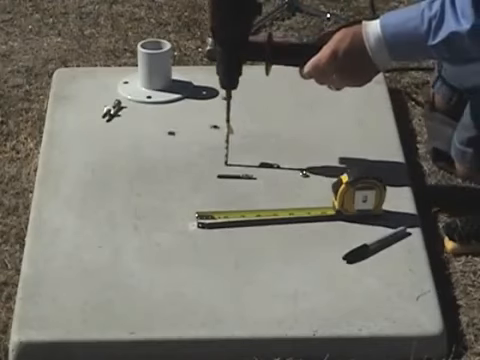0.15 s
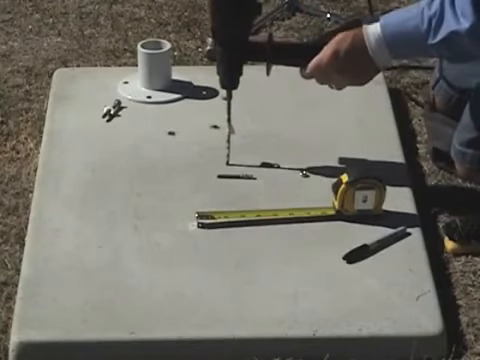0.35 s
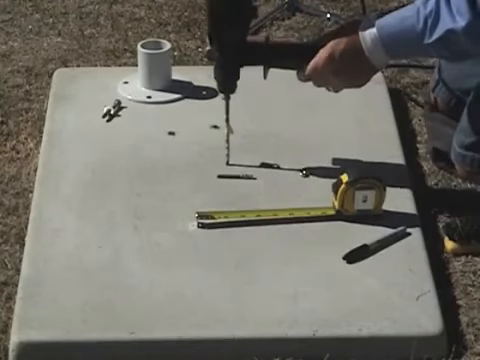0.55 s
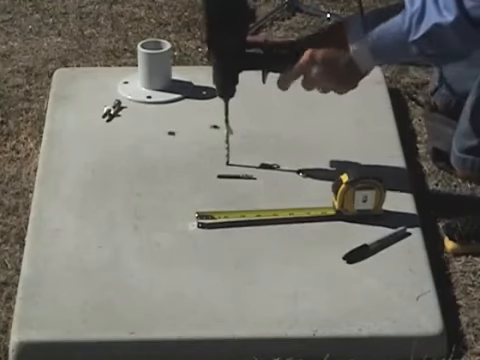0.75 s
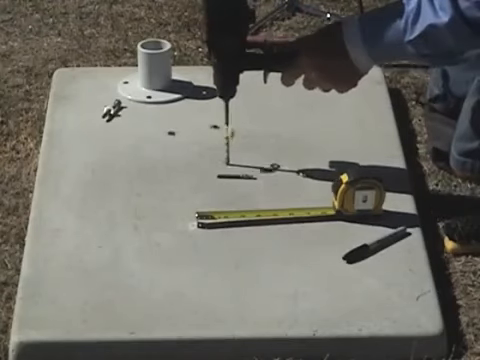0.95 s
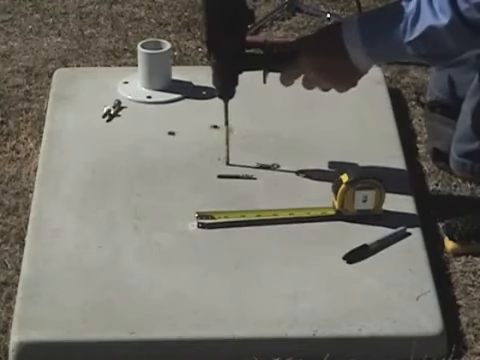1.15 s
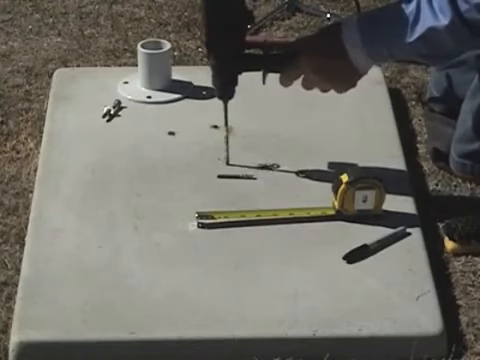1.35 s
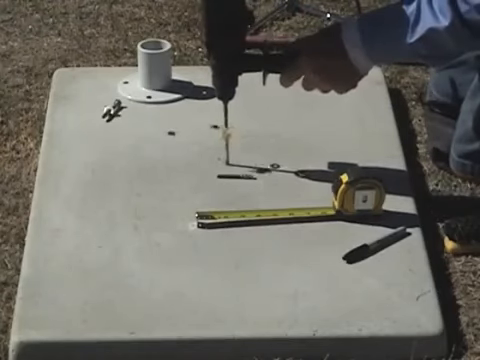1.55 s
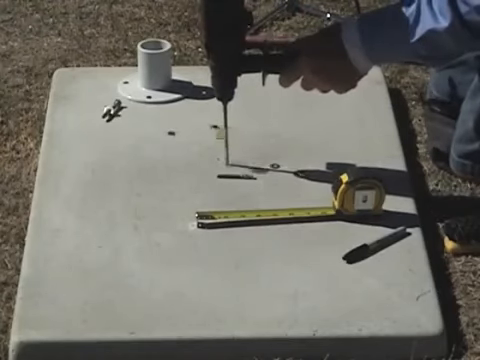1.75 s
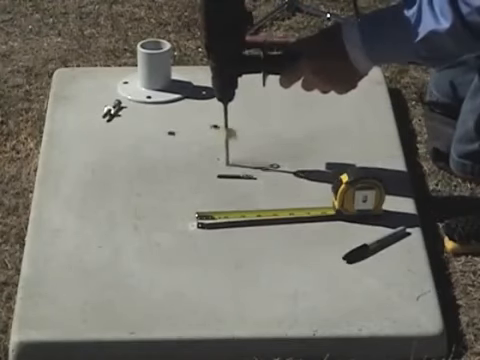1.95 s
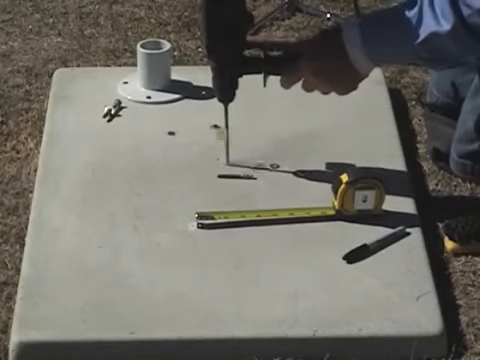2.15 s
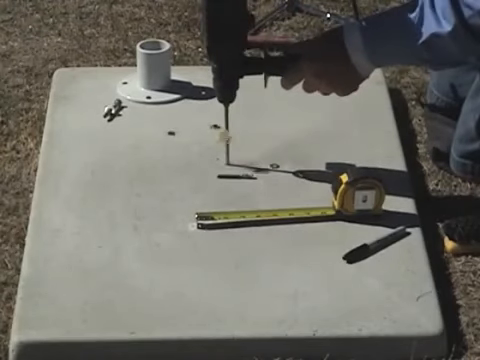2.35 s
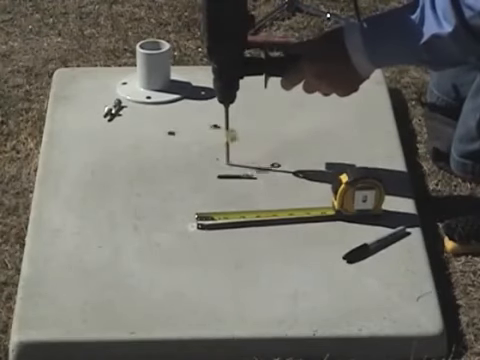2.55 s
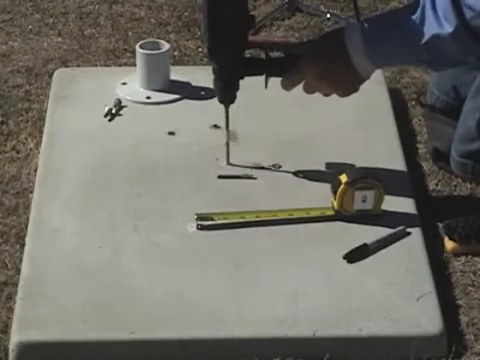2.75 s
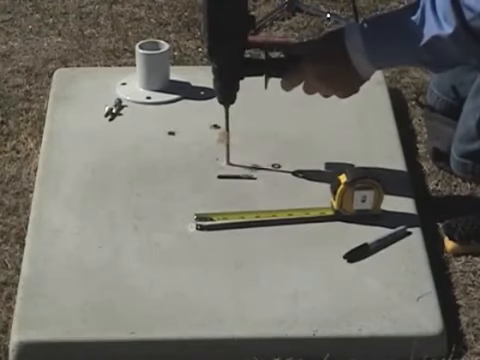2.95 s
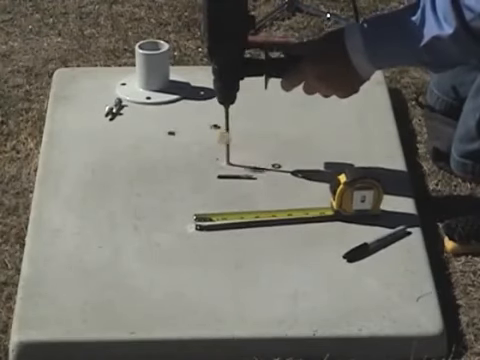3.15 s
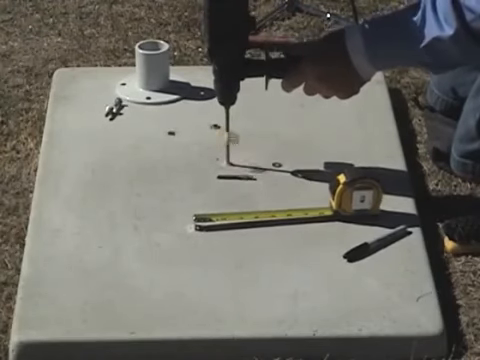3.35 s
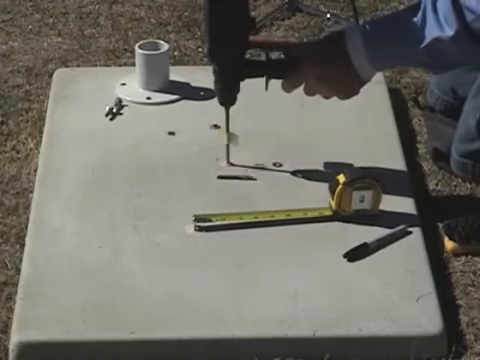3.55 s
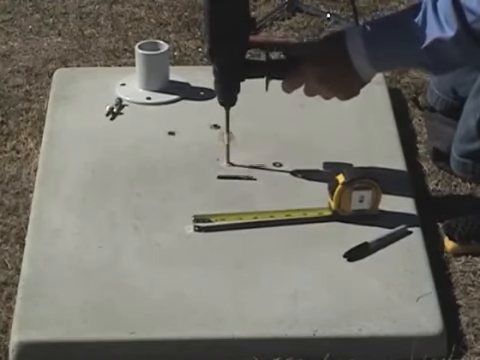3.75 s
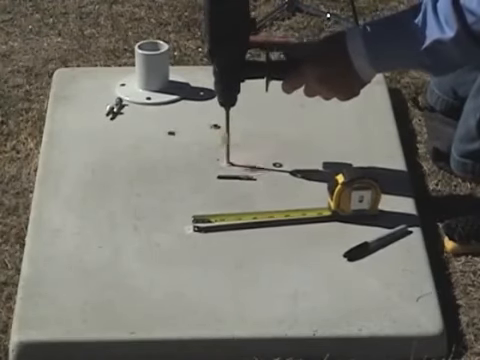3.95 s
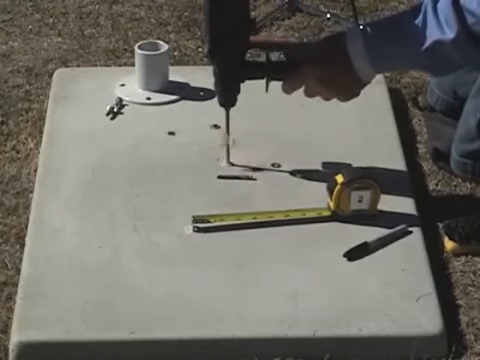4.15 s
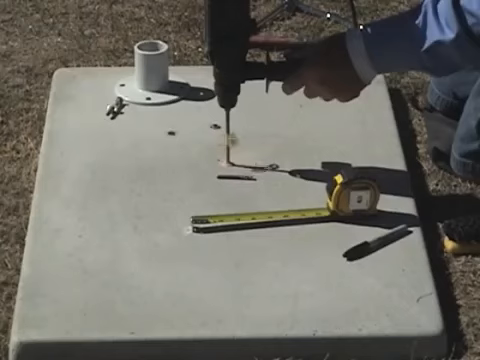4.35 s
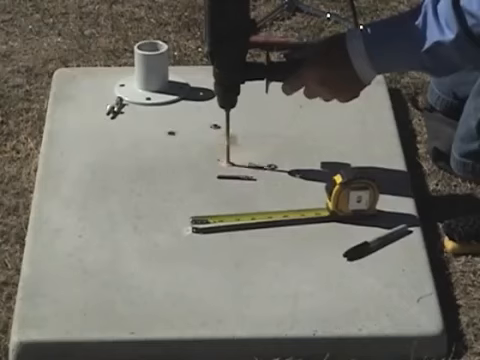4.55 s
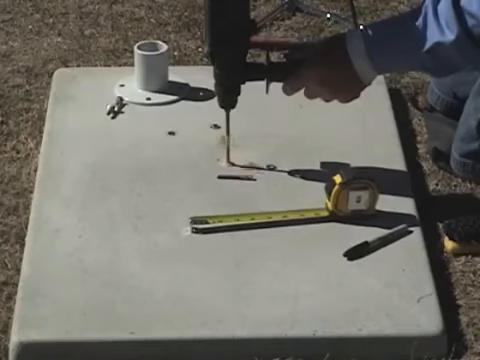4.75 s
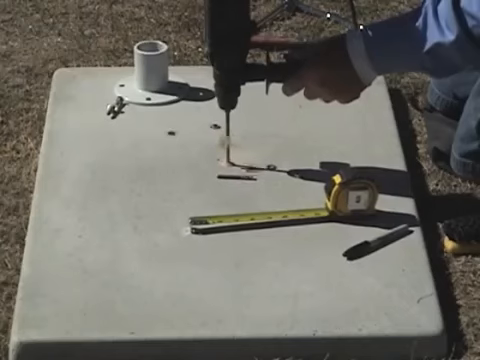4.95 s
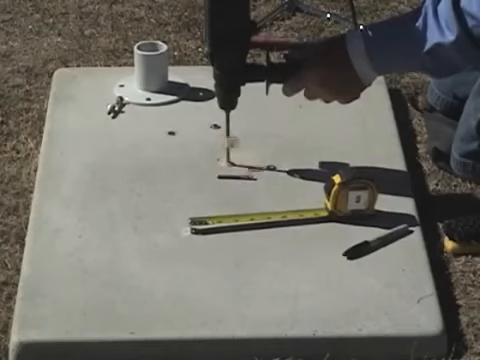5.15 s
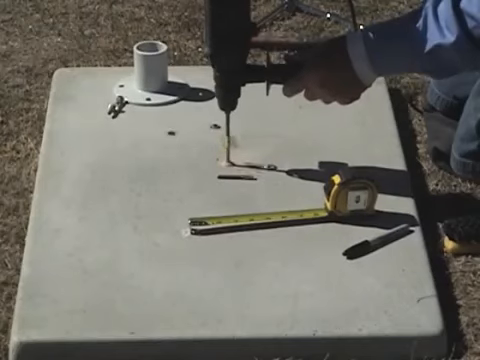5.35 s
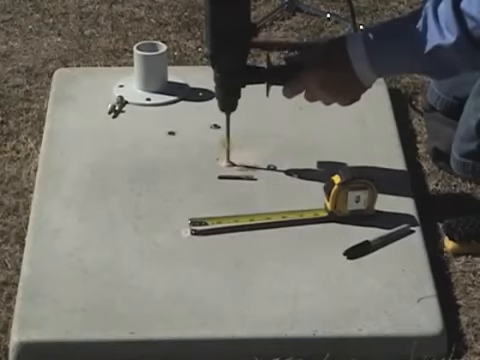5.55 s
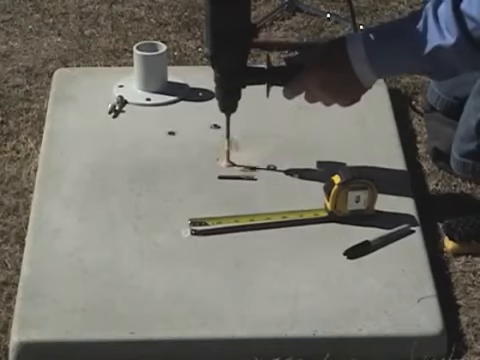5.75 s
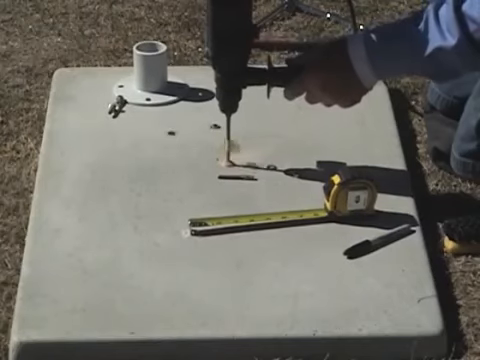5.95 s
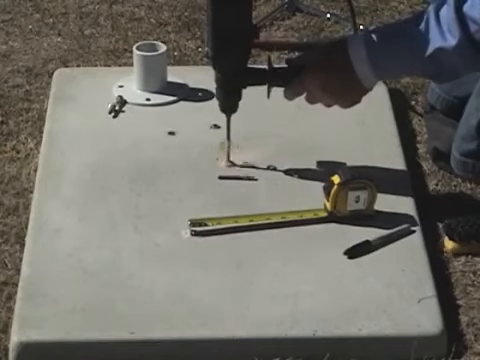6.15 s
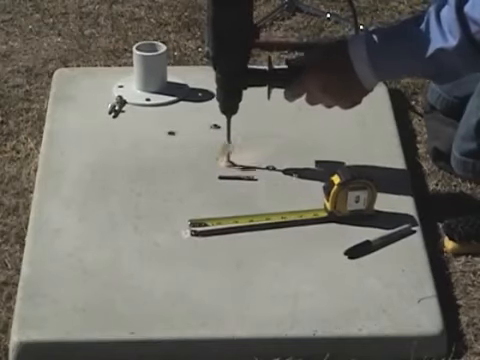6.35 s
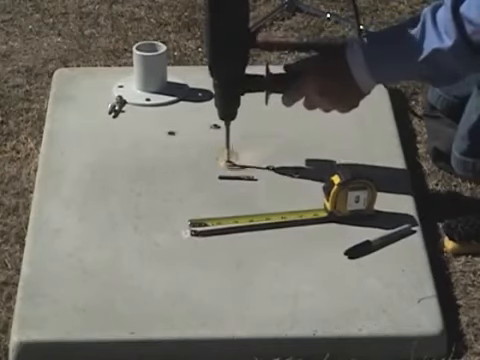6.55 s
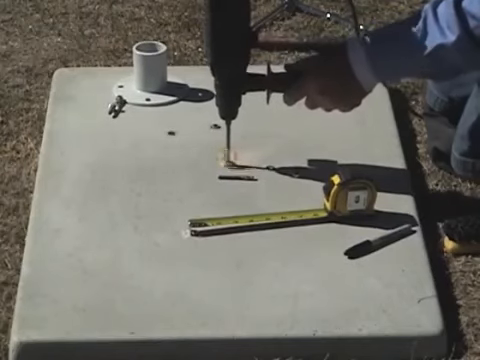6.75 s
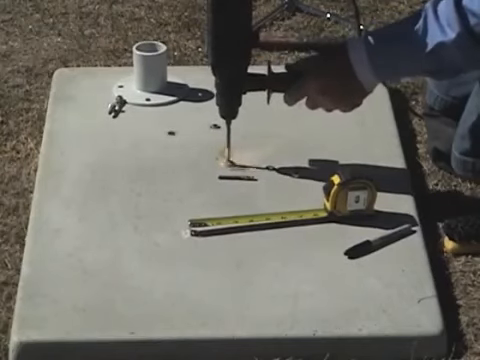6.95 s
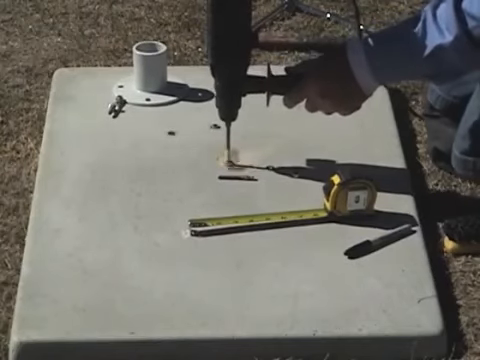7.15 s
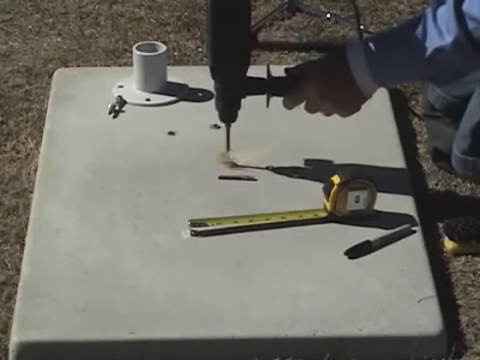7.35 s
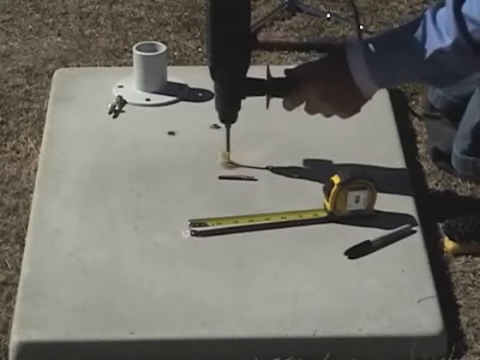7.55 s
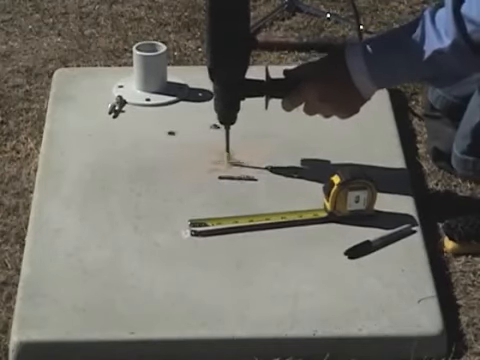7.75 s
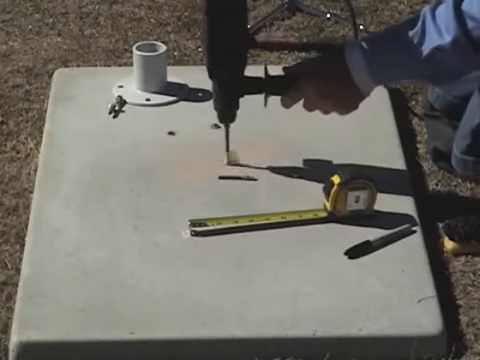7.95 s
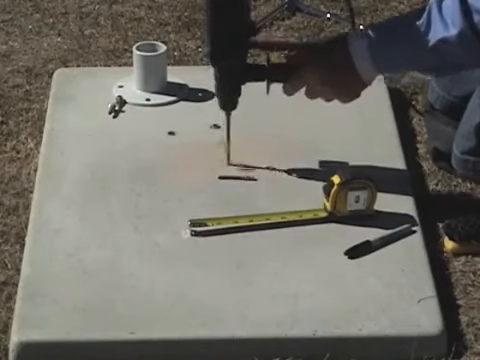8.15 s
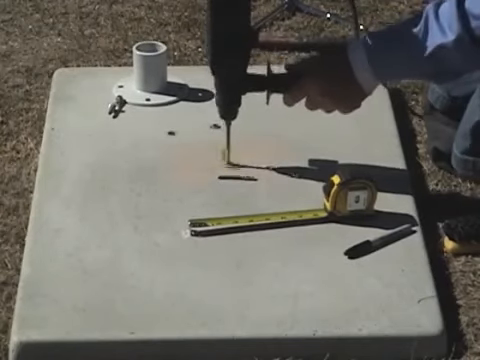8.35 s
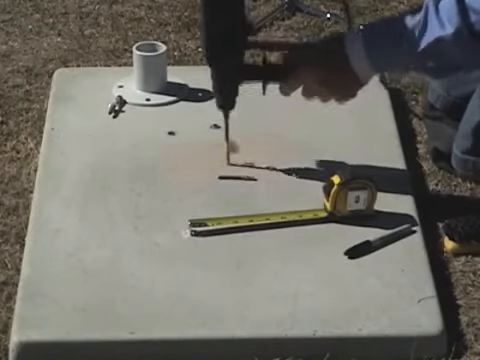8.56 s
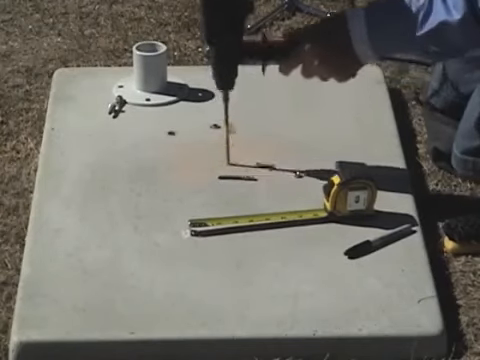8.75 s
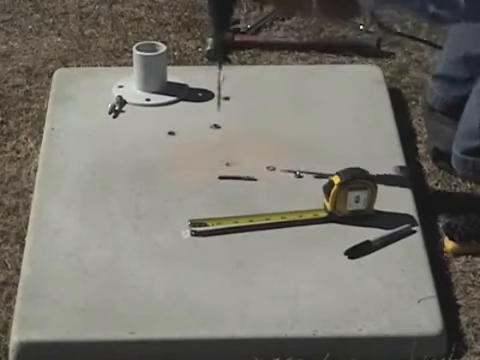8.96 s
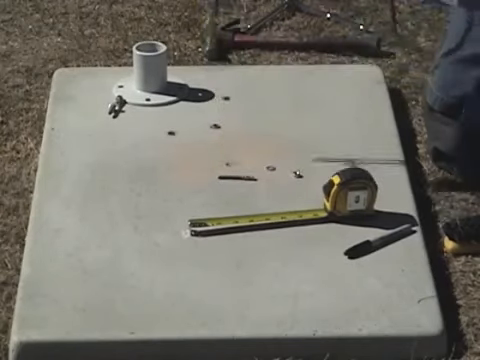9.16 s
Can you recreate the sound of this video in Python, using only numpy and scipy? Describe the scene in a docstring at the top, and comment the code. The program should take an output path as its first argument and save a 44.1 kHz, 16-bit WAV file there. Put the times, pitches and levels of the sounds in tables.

```python
"""A hammer drill bores into a concrete slab outdoors. The bit is set down, the motor starts, and the
striker knocks slowly, then at about 76 blows a second. Each impact excites the modes of bit, housing
and slab and crushes grit. The pressure is eased and the striker drops out; the gears rattle and whine
on, and the loose bit clacks and squeals by friction, until the motor winds down. Nearby surfaces
scatter a short echo over a faint rumble of open air."""
import sys
import numpy as np
from scipy import signal
from scipy.fft import rfft, irfft, next_fast_len
from scipy.io import wavfile
from scipy.ndimage import uniform_filter1d

SR = 44100
rng = np.random.default_rng(int(sys.argv[2]) if len(sys.argv) > 2 else 0)


def store_wav(level_fs):
    """Save 16-bit WAV to argv[1]."""
    pcm = np.round(np.clip(np.atleast_2d(level_fs), -1, 1) * 32767)
    wavfile.write(sys.argv[1], SR, pcm.T.astype(np.int16))


N = 406513
T = np.arange(N) / SR
FFT_SIZE = next_fast_len(N + SR)
HZ = np.arange(FFT_SIZE // 2 + 1) * SR / FFT_SIZE + 1e-6

# Levels in the tables are relative: each source sets its own overall gain.
# modes of bit and chuck: (frequency [Hz], bandwidth before damping by the hole [Hz], level [dB])
BIT_MODES = [(1262, 74, -10.5), (1403, 60, -7), (1900, 266, -12), (2036, 23, -2), (2490, 169, -12),
             (2817, 190, -16.5), (4266, 370, -22)]
# modes of housing and slab: (frequency [Hz], bandwidth [Hz], level [dB])
HOUSING_MODES = [(391.4, 40, -12.5), (447.2, 21, -10), (613, 9, -16.5), (766, 28, -3), (805.8, 21, 2.5),
                 (911, 36, -18), (1130, 176, -15.5)]
# spectrum of crushed stone: (frequency [Hz], level [dB])
GRIT_SPECTRUM = [(60, -3), (500, 0.5), (1200, 4.5), (2600, -3), (3300, -5), (4300, -4), (5300, -14.5),
                 (7500, -5.5), (9200, -7.5), (10400, -12.5)]
# stray blows while the motor creeps: (time [s], blow level [dB], tick level [dB])
STRAY_BLOWS = [(1.028, -30, -34), (1.094, -22, -14), (1.12, -6.5, -11), (1.186, -12, -12),
               (1.267, -15, -32)]
# the bit is set down: (time [s], housing level [dB], bit level [dB], tick level [dB], cutoff [Hz])
SET_DOWN_TAPS = [(0.107, 11, 6.5, -55, 1450), (0.874, -10, 3, -29, 2500), (.887, 24.5, 16, -20.5, 2670)]
# crank speed under load, wavering with the pressure on the bit: (time [s], speed [Hz])
LOADED_CRANK = [(2.05, 70.8), (2.17, 73.2), (2.25, 74.25), (2.96, 76.8), (3.12, 75.8), (3.29, 77.48),
                (4.24, 77.26), (4.36, 76.45), (4.96, 76.76), (5.84, 74.84), (6.3, 75.7), (6.54, 75.14)]
# resonances of the gearbox: (frequency [Hz], bandwidth [Hz], level [dB])
GEARBOX_MODES = [(430, 95, -8.5), (682, 28.5, 5), (924, 226, -0.5), (1400, 200, -4.5), (1875, 334, 2),
                 (2280, 132, 3.5), (2925, 320, -1), (4320, 400, -2.5), (4674, 210, -4.5), (5440, 180, -4.5),
                 (6650, 1100, -17), (8280, 730, -11.5), (9440, 1500, -13)]
# spectrum of the fan's rush: (frequency [Hz], level [dB])
FAN_SPECTRUM = [(60, -48), (300, -19.5), (600, -9.5), (1500, -8), (3600, -5.5), (5000, -9.5), (6100, -7),
                (7600, -11), (10400, -28)]
# the loose bit clacks in its chuck: (time [s], level [dB])
CHUCK_CLACKS = [(7.065, -8), (7.361, -7), (8.458, -7), (8.966, -20)]
# the spinning bit rubs the wall of the hole: (centre time [s], half duration [s], level [dB])
WALL_RUBS = [(7.102, 0.19, -35), (8.354, .16, -29.5), (8.786, 0.096, -31.5)]
# spectrum of the outdoor rumble: (frequency [Hz], level [dB])
AIR_SPECTRUM = [(15, -53), (25, -28), (59, -15), (108, -11), (139, -7.5), (184, -12.5), (219, -14),
                (268, -19.5), (900, -21.5), (1690, -31), (2660, -28.5), (7300, -38), (10400, -44),
                (13500, -76), (22000, -120)]

# the trigger is squeezed in three steps; then the pressure is released, and last the trigger
START_S, SLOW_S, HAMMER_S, RELEASE_S, OFF_S = 1.02, 1.337, 1.611, 6.555, 8.565
CREEP_HZ, SLOW_HZ, FREE_HZ = 13, 28.7, 88.1  # crank speed: creeping, knocking slowly, unloaded
RACE_S = 0.1378  # time constant of the run-up once unloaded
SUNK_S, SINKING_S = 2.52, 0.79  # the tip sinks below the surface: onset, time constant
SLAB_HZ, SLAB_WIDTH_HZ = 161.5, 13  # the slab's lowest mode
LIGHT_TOUCH_RISE = .025  # housing modes lie higher by this fraction before the drill is leant on


def hammering(speed, jitter_s=.00004, limp_s=.00005, drop_out_s=0.036, fade_db_per_s=0.04):
    """Periodic impact: one blow a crank turn, alternately early and late, excites steel and stone."""
    striking = (T >= HAMMER_S) * (T < RELEASE_S + drop_out_s / 2)
    turns = np.cumsum(speed * striking) / SR
    count = np.arange(int(turns[-1]) + 1)
    at = np.searchsorted(turns, count + 1e-9)
    jitter, size_spread, crush_spread, rattle_spread = np.clip(rng.standard_normal((len(at), 4)).T, -2, 2)
    alternate = (-1.) ** count
    times = T[at] + jitter_s * jitter + limp_s * alternate
    pace = speed[at] / speed[at].max()
    size = amp(.5 * size_spread) * (1 + 0.0091 * alternate)  # pressed home, the blows are nearly alike
    size *= amp(-7 * np.maximum((times - RELEASE_S) / drop_out_s + .5, 0))  # the last ones die away
    # blows weaken as the pressure is eased and as the hole deepens
    force_db = -2.5 * easing()[at] - fade_db_per_s * (times - HAMMER_S)
    hits = impulses(times, size * amp(force_db) / pace ** 0.37)
    ring = bit(hits, scrape_db=-39, scrape_s=0.0022)
    blows = unit_while_hammering(housing(hits) + ring) * amp(-15.5)
    crushes = impulses(times + 0.00064, size * amp(3 * crush_spread) / pace ** 0.49)
    rebounds = impulses(times + .68 / speed[at], size * amp(1.5 * rattle_spread - 5))
    return blows + grit(crushes, rebounds) + boom(hits) + thud(times, pace) + chips(times) + bite(times)


def bit(hits, lag_s=0.001786, bounce_s=0.000798, scrape_db=-24, scrape_s=0.0033, min_width_hz=48):
    """Modal superposition: the bit rings as it is struck, lands hard, bounces once and scrapes."""
    contacts = 0.27 + delay(lag_s) * (1 + 0.26 * delay(bounce_s))
    push = minimum_phase(1 / (1 + (HZ / 9000) ** 2))
    # neighbouring modes swing in opposite senses; the hole sets a least damping
    modes = sum((-1) ** k * amp(db) * resonance(hz, max(width, min_width_hz))
                for k, (hz, width, db) in enumerate(BIT_MODES))
    scrape = amp(scrape_db) * bursts(hits, scrape_s)
    return filtered(hits + scrape, contacts * modes * push)


def housing(hits, rise=0):
    """Impulse response: a blow sets the damped modes of housing and slab ringing together."""
    modes = [(hz * (1 + rise), width, db) for hz, width, db in HOUSING_MODES]
    power = modal_power(modes) / (1 + (260 / HZ) ** 4)
    return filtered(hits, minimum_phase(np.sqrt(power)))


def grit(crushes, rebounds, surface_db=-25, deep_db=-28.5):
    """Impact noise: stone is crushed and the returning striker rattles; dust in the hole absorbs some."""
    crunch = bursts(crushes, decay_s=0.0024) + bursts(rebounds, decay_s=.003)
    level_db = surface_db + (deep_db - surface_db) * settle(SUNK_S, SINKING_S)
    return unit_while_hammering(filtered(crunch, spectrum(GRIT_SPECTRUM))) * amp(level_db)


def boom(hits, knee=0.4, unseated_db=-10, seating_s=0.32):
    """Resonance: the slab's lowest mode swells, to a limit, when a harmonic of the blow rate meets it."""
    slab = filtered(hits, resonance(SLAB_HZ, SLAB_WIDTH_HZ) * resonance(SLAB_HZ, width_hz=53))
    power = np.abs(uniform_filter1d(slab ** 2, SR // 8))
    swing = np.sqrt(power + knee * np.var(slab))
    return slab / swing * amp(-26 + unseated_db * (1 - settle(HAMMER_S, seating_s)))


def thud(times, pace, cutoff_hz=200):
    """Low-pass noise: each blow carries a dull thud, stronger at a faster pace."""
    puffs = bursts(impulses(times, pace ** 3), decay_s=0.0099)
    return unit_while_hammering(filtered(puffs, 1 / (1 + (HZ / cutoff_hz) ** 2))) * amp(-45.5)


def chips(times, hz=8800, width_hz=1800, spread_db=4.5):
    """Brittle fracture: until the tip has sunk in, each blow splinters the surface with a bright tick."""
    sizes = amp(spread_db * np.clip(rng.standard_normal(len(times)), -2, 2))
    cracks = bursts(impulses(times + 0.00053, sizes), decay_s=0.0014)
    ticks = unit_while_hammering(filtered(cracks, resonance(hz, width_hz)))
    return ticks * amp(-34) * (1 - settle(SUNK_S, SINKING_S))


def bite(times, hz=4270, width_hz=450, lag_s=0.00035, fade_db_per_s=2.3):
    """Frictional excitation: each scrape rings a high mode of the bit, fading as the hole deepens."""
    scrapes = bursts(impulses(times + lag_s, np.ones(len(times))), decay_s=0.0018)
    ring = unit_while_hammering(filtered(scrapes, resonance(hz, width_hz) ** 2))
    return ring * amp(-33 - fade_db_per_s * np.maximum(T - SUNK_S, 0)) * settle(HAMMER_S, time_s=.5)


def knocks(count=8, flake_s=1.513):
    """Free vibration: stray blows, then a slow, even run, each ring steel and slab and crush stone."""
    turn = np.arange(count)
    blow_spread, tick_spread = rng.standard_normal((count, 2)).T
    run_db = -4 - 4.5 * (turn == 0) + 1.6 * blow_spread
    run = [SLOW_S + turn / SLOW_HZ, run_db, -19 + 3 * tick_spread]
    times, blow_db, tick_db = np.hstack([np.transpose(STRAY_BLOWS), run])
    hits = impulses(times, amp(blow_db))
    body = housing(hits, LIGHT_TOUCH_RISE) + amp(-11) * filtered(hits, resonance(SLAB_HZ, SLAB_WIDTH_HZ))
    ring = bit(hits, lag_s=0.00085, scrape_db=-21, scrape_s=0.0075)
    cracks = impulses(np.append(times, flake_s), amp(np.append(tick_db, -6)))  # a flake breaks off too
    ticks = filtered(bursts(cracks, decay_s=0.0044), spectrum(GRIT_SPECTRUM))
    return amp(41.5) * body + amp(34) * ring + amp(-1) * ticks


def set_down():
    """Soft contact acts as a low-pass: the bit meets the slab and rings mostly low modes, with a tick."""
    body_force = bit_force = tick_force = 0
    for time, body_db, bit_db, tick_db, cutoff_hz in SET_DOWN_TAPS:
        tap = impulses(np.array([time]), [1.])
        force = signal.sosfilt(signal.butter(3, cutoff_hz, fs=SR, output="sos"), tap)
        body_force += amp(body_db) * force
        bit_force += amp(bit_db) * force
        tick_force += amp(tick_db) * tap
    slab = amp(-4) * filtered(body_force, resonance(SLAB_HZ, SLAB_WIDTH_HZ))
    ring = bit(bit_force)
    ticks = filtered(bursts(tick_force, decay_s=0.0023), spectrum(GRIT_SPECTRUM))
    return housing(body_force, LIGHT_TOUCH_RISE) + slab + ring + ticks


def crank_speed(first_blow_hz=36.3, climb_hz_per_s=80, halving_s=.44):
    """Drive against load: the crank steps up, is held by the work, races when freed, slows by drag."""
    slow = CREEP_HZ * settle(START_S, .04) + (SLOW_HZ - CREEP_HZ) * settle(SLOW_S, .02)
    climb = first_blow_hz + climb_hz_per_s * (T - HAMMER_S)
    limit = np.interp(T, *np.transpose(LOADED_CRANK))
    loaded = np.minimum(np.maximum(slow, climb), limit)
    driven = loaded + (FREE_HZ - loaded) * settle(RELEASE_S, RACE_S)
    return driven / (1 + np.maximum(T - OFF_S, 0) / halving_s)


def easing(start_s=6.04):
    """Unloading: how far the pressure has been eased before the release, 0 to 1."""
    return np.clip((T - start_s) / (RELEASE_S - start_s), 0, 1)


def motor(speed):
    """Rotating machinery: gears and piston follow one crank angle; the loose bit rings the gearbox."""
    angle = 2 * np.pi * np.cumsum(speed * (1 + 0.00498 * wander(23.4))) / SR
    gearbox = np.sqrt(spectrum(FAN_SPECTRUM) ** 2 + modal_power(GEARBOX_MODES, order=2))
    rattle = gear_noise(speed, angle, gearbox)
    clacks = chuck_clacks(gearbox)
    running = np.clip((T - START_S) / 0.046, 0, 1)
    return running * (rattle + gear_whine(angle) + piston(angle)) + clacks


def gear_noise(speed, angle, gearbox, spread_db=4, muffle_hz=5500, light_load=0.67):
    """Broadband excitation: fan rush and loose teeth ring the gearbox, pulsing with the crank."""
    pulse = 1 + .16 * np.cos(angle) + .14 * np.cos(2 * angle) + .14 * np.cos(4 * angle)
    contacts = rng.random(N) < 14 * speed / SR
    clatter = unit(contacts * np.sign(noise()) * amp(spread_db * np.minimum(rng.exponential(size=N), 3)))
    rush = unit(filtered(pulse * (noise() + amp(-3) * clatter), gearbox))
    # pressure on the bit takes up the play in the gears: softer and duller
    leaning = light_load + (1 - light_load) * settle(HAMMER_S, time_s=0.05)
    load = leaning * (1 - .2 * easing()) * (T < RELEASE_S)
    muffled = amp(-6) * filtered(rush, 1 / np.sqrt(1 + (HZ / muffle_hz) ** 4))
    dull = load + 0.51 * settle(OFF_S, time_s=0.35)  # coasting, the teeth also meet more gently
    return (dull * muffled + (1 - dull) * rush) * amp(gear_gain_db(speed) + 0.3 * wander(8.6))


def gear_gain_db(speed, creep_db=-24.5, loaded_db=-15.5, free_db=-19, db_per_octave=5):
    """Noise grows with drive: it jumps with the trigger and, running free, follows speed and rubs."""
    squeezed, full = settle(SLOW_S - .025, time_s=0.018), settle(HAMMER_S, time_s=0.14)
    working = creep_db + (loaded_db - creep_db) * squeezed - 1.5 * (squeezed - full)
    free = free_db + db_per_octave * np.log2(np.maximum(speed, CREEP_HZ) / FREE_HZ)
    # the gears sound quieter at release, then swell back as the recorder's automatic gain recovers
    gain_recovery_db = -6 * (1 - settle(RELEASE_S, time_s=0.21))
    return np.where(T < RELEASE_S, working, free + gain_recovery_db + rubbing() / rubbing().max())


def gear_whine(angle, teeth=26, creep_db=-46, loaded_db=-42, free_db=-43.5, coast_db=-34.5):
    """Tooth meshing: a modulated tone at the tooth rate, strongest as the motor brakes."""
    phase_wobble = (.7 + .6 * settle(OFF_S, time_s=.2)) * wander(70)
    mesh = np.sin(teeth * angle + phase_wobble) * (1 + .7 * np.cos(angle) + .5 * wander(50))
    level_db = (creep_db + (loaded_db - creep_db) * settle(SLOW_S, time_s=.4)
                + (free_db - loaded_db) * settle(RELEASE_S, time_s=.2)
                + (coast_db - free_db) * settle(OFF_S, time_s=.05))
    return mesh * amp(level_db)


def piston(angle):
    """Forced vibration: the piston rocks the slab at the second and third harmonics of the crank."""
    harmonics = np.sin(2 * angle) + .5 * np.sin(3 * angle)
    # just after the release the bit still leans on the slab
    shudder_db = 5 * (T > RELEASE_S) * (1 - settle(RELEASE_S, time_s=.1))
    force = harmonics * amp(5.8 * wander(12) + shudder_db)
    return amp(-40) * filtered(force, resonance(SLAB_HZ, SLAB_WIDTH_HZ) ** 2)


def chuck_clacks(gearbox):
    """Impact across a clearance: the loose bit strikes its chuck and rings the gearbox."""
    times, db = np.transpose(CHUCK_CLACKS)
    return filtered(bursts(impulses(times, amp(db)), decay_s=0.0011), gearbox)


def squeal(speed, free_pitch_hz=4330, width_hz=340, sag=0.1):
    """Friction-induced vibration: the flutes rub the hole and excite a mode that sags with the speed."""
    pitch = free_pitch_hz * (1 - sag * (1 - speed / FREE_HZ))
    friction = unit(filtered(noise(), 1 / (1 + (2 * HZ / width_hz) ** 2)))
    tone = np.sqrt(2) * friction * np.sin(2 * np.pi * np.cumsum(pitch) / SR + wander(40))
    light_rub = amp(-44) * settle(RELEASE_S, RACE_S) * speed / FREE_HZ
    return tone * (rubbing() + light_rub) * amp(3.7 * wander(14))


def rubbing():
    """Intermittent contact: each rub swells and fades as a Gaussian."""
    return sum(amp(db) * np.exp(-((T - time) / half_s) ** 2) for time, half_s, db in WALL_RUBS)


def echo(sound, echo_db=-15, decay_s=0.047):
    """Scattering: ground and nearby things return a short, faint tail, different on each side."""
    age = T[:SR // 4]
    tails = rng.standard_normal((2, len(age))) * np.exp(-age / decay_s) * (age > .002)
    tails /= np.sqrt(np.sum(tails ** 2, axis=1, keepdims=True))
    return amp(echo_db) * filtered(sound, rfft(tails, FFT_SIZE) * HZ / (HZ + 400))


def air(level_db=-49):
    """Partial coherence: an even outdoor rumble, much the same on both sides."""
    sides = noise() + 0.69 * np.array([noise(), noise()])
    return unit(filtered(sides, spectrum(AIR_SPECTRUM))) * amp(level_db)


def amp(db):
    """Decibels to amplitude ratio."""
    return 10 ** (np.asarray(db) / 20)


def unit(x):
    """Normalisation to rms 1."""
    return x / np.sqrt(np.mean(x ** 2))


def unit_while_hammering(x):
    """Normalisation to rms 1 over the span of the fast blows."""
    return x / np.sqrt(np.mean(x[(T > HAMMER_S) & (T < RELEASE_S)] ** 2))


def settle(start_s, time_s):
    """Exponential relaxation from 0 towards 1."""
    return 1 - np.exp(-np.maximum(T - start_s, 0) / time_s)


def filtered(x, response):
    """Convolution, as a product of spectra."""
    return irfft(rfft(x, FFT_SIZE) * response, FFT_SIZE)[..., :N]


def delay(time_s):
    """Linear phase: the response of a pure delay."""
    return np.exp(-2j * np.pi * HZ * time_s)


def resonance(hz, width_hz):
    """Response of a damped oscillator, gain 1 at its centre."""
    return 1 / (1 + 1j * (HZ / hz - hz / HZ) * hz / width_hz)


def modal_power(table, order=1):
    """Power sum of resonances; a higher order has steeper flanks."""
    return sum(amp(db) ** 2 / (1 + ((HZ / hz - hz / HZ) * hz / width) ** 2) ** order
               for hz, width, db in table)


def minimum_phase(gain):
    """Minimum phase: the causal response that starts soonest for a given gain curve."""
    cepstrum = irfft(np.log(gain + 1e-4), FFT_SIZE)
    return np.exp(rfft(cepstrum * (1 + np.sign(np.fft.fftfreq(FFT_SIZE)))))


def spectrum(points):
    """Spectral envelope: gain through (frequency [Hz], level [dB]) points."""
    hz, db = np.transpose(points)
    return amp(np.interp(np.log(HZ), np.log(hz), db))


def noise():
    """White noise of rms 1."""
    return rng.standard_normal(N)


def wander(rate):
    """Low-pass noise: a smooth random drift of rms 1."""
    return unit(signal.sosfilt(signal.butter(4, .85 * rate, fs=SR, output="sos"), noise()))


def impulses(times, sizes):
    """An impulse train."""
    return np.bincount(np.clip(times * SR, 0, N - 1).astype(int), sizes, N)


def bursts(hits, decay_s):
    """Exponential decay: a puff of noise dies away after each impulse."""
    return signal.lfilter([1], [1, -np.exp(-1 / (decay_s * SR))], hits) * noise()


def scene():
    """Superposition: the drill just left of centre, its echo and the open air."""
    speed = crank_speed()
    drill = set_down() + knocks() + hammering(speed) + motor(speed) + squeal(speed)
    return drill * amp(np.array([[.17], [-.17]])) + echo(drill) + air()


def record(dry, ceiling=.88, top_hz=10330):
    """Soft saturation rounds the highest peaks, and a steep low-pass cuts the top."""
    rounded = dry / (1 + (dry / ceiling) ** 4) ** .25
    return signal.sosfilt(signal.ellip(12, .2, 80, top_hz, fs=SR, output="sos"), rounded)


dry = scene()
out = record(dry)
store_wav(out)
```